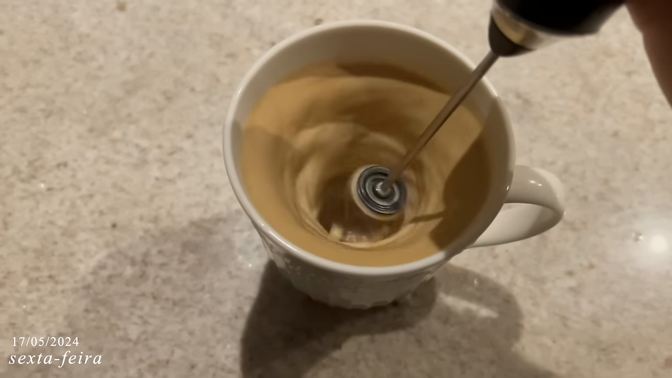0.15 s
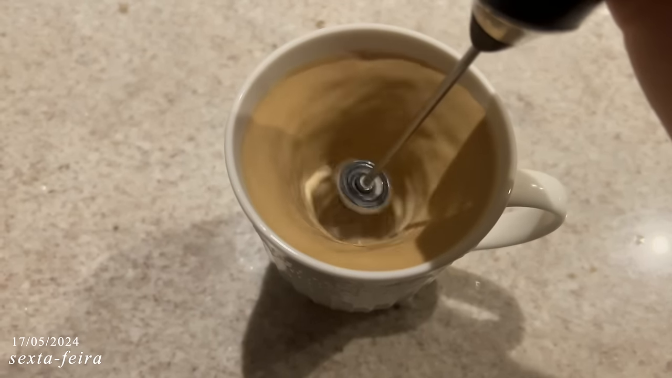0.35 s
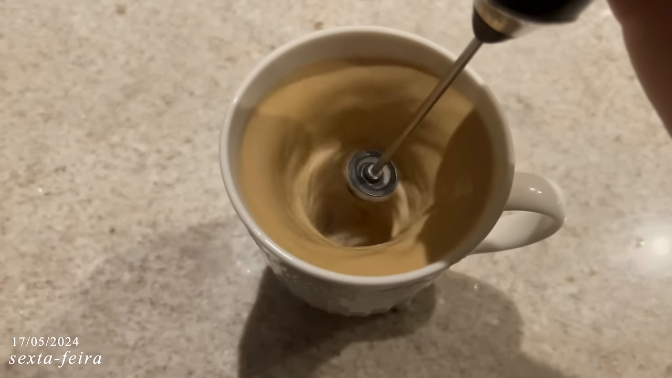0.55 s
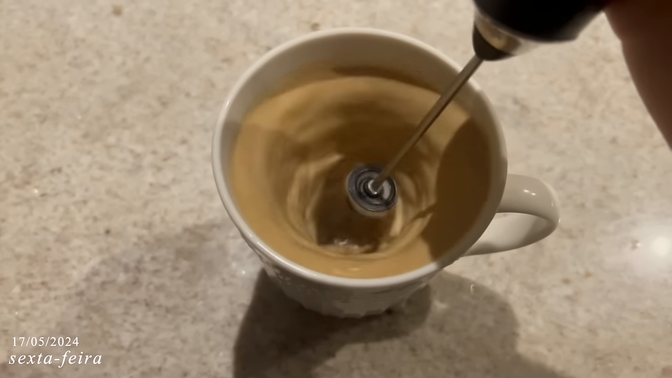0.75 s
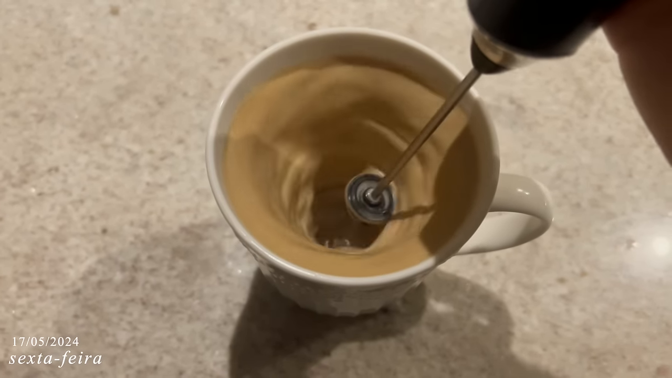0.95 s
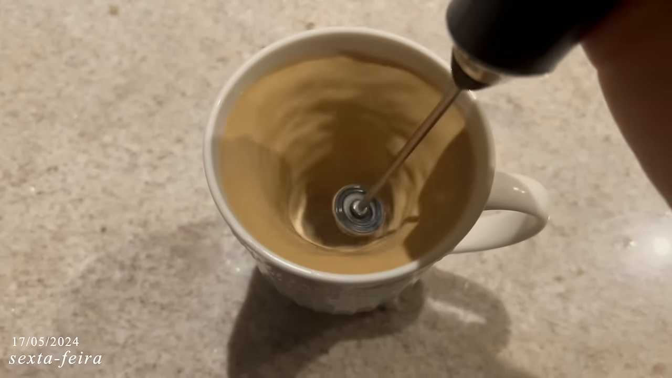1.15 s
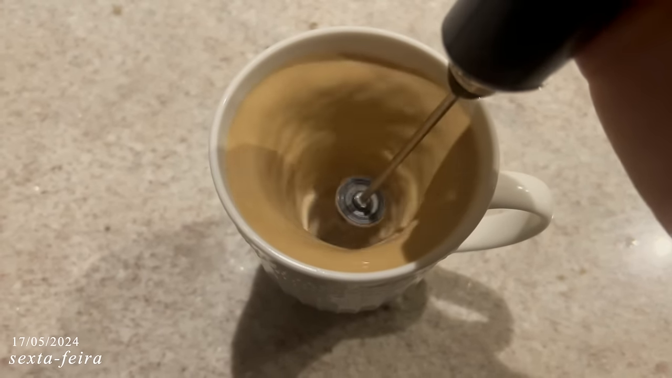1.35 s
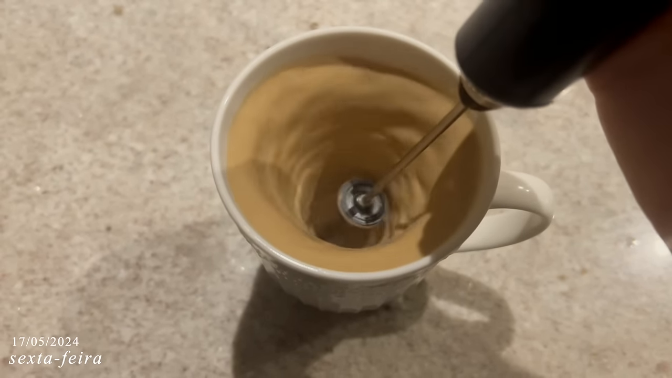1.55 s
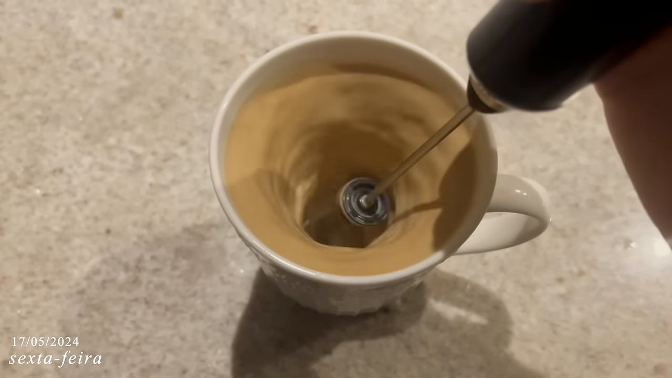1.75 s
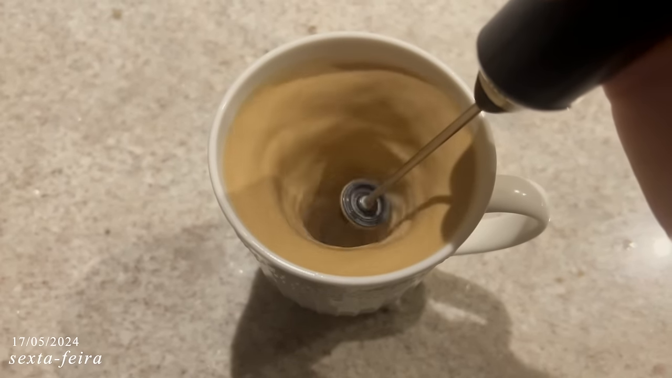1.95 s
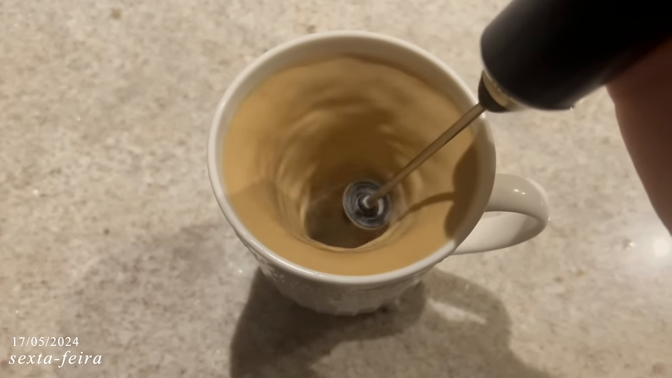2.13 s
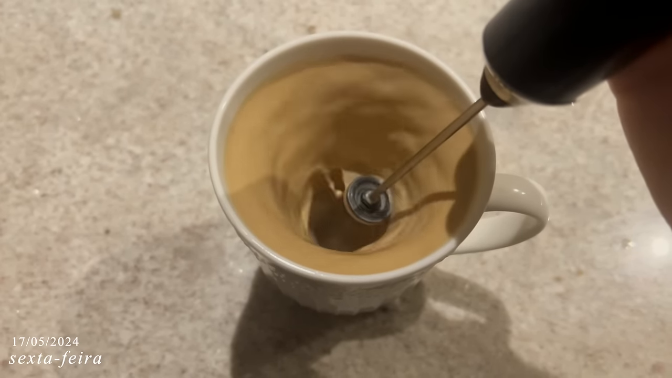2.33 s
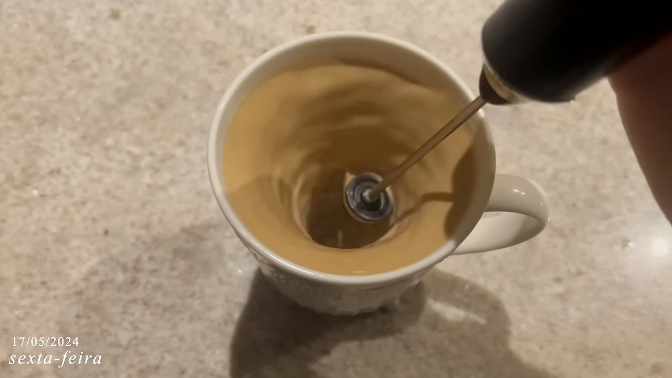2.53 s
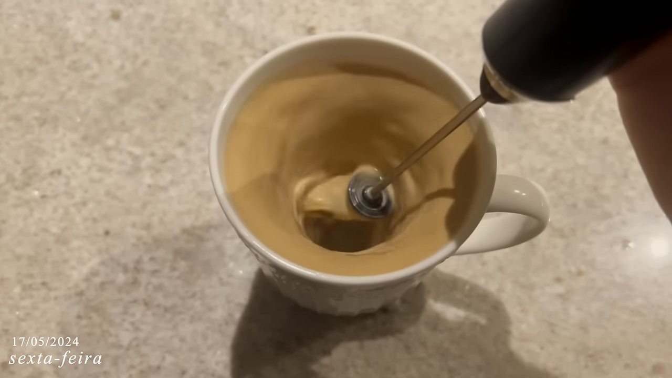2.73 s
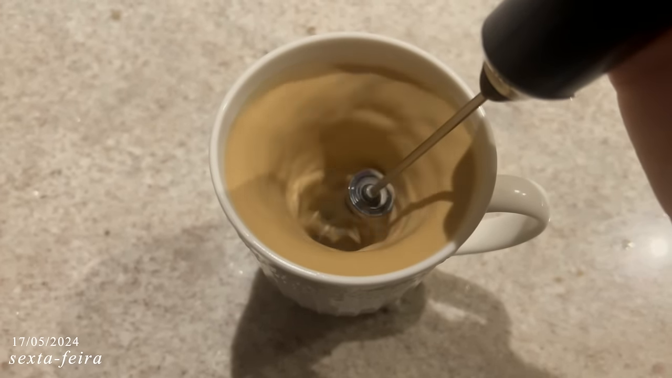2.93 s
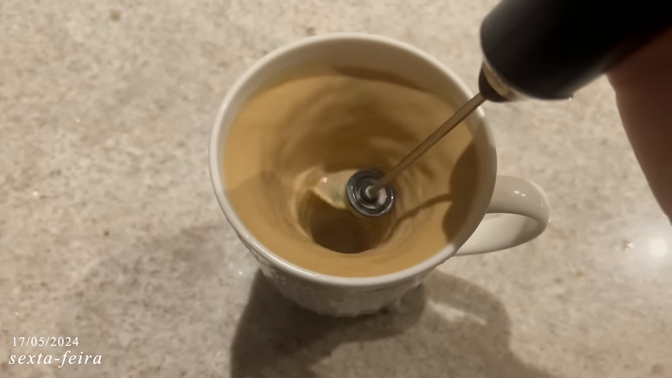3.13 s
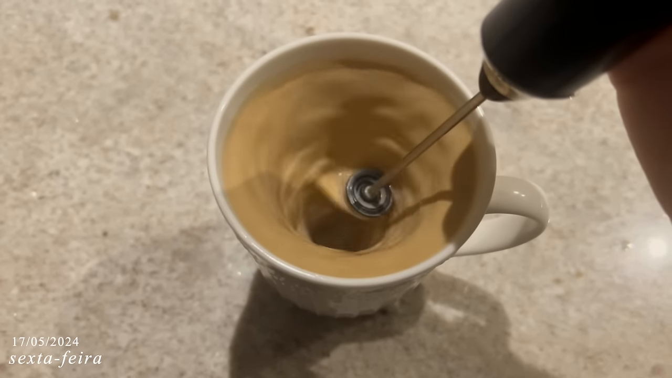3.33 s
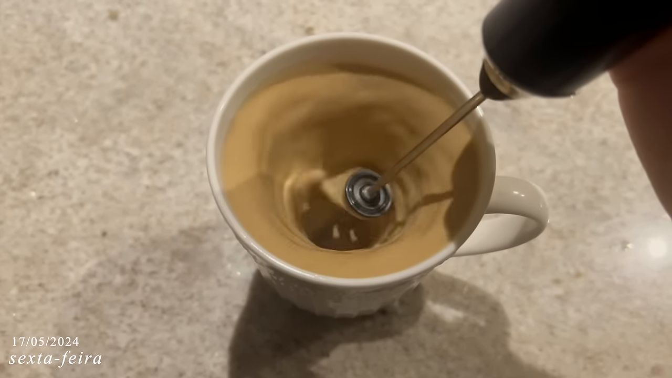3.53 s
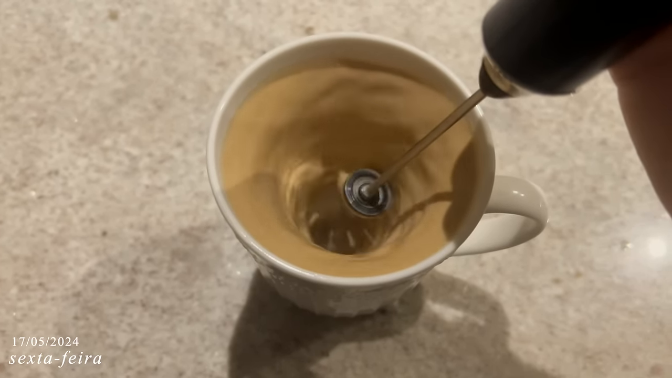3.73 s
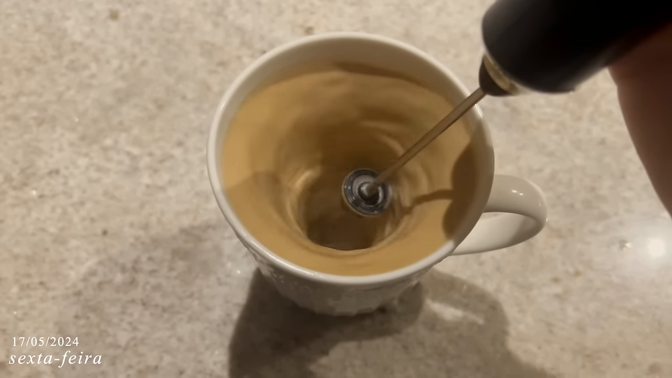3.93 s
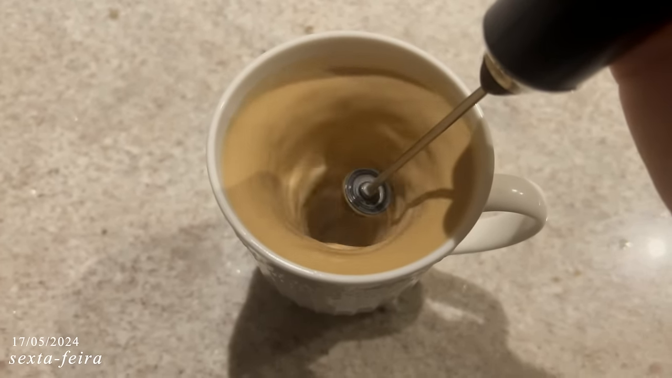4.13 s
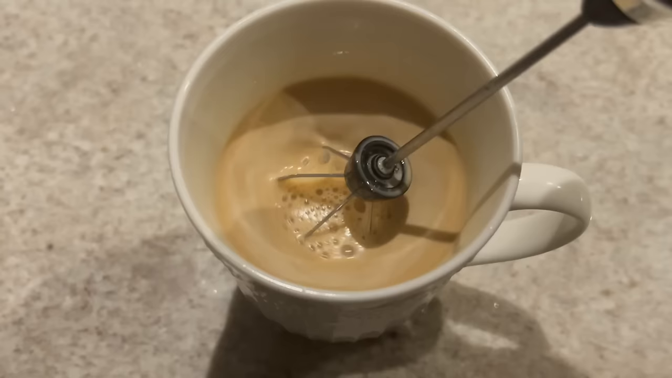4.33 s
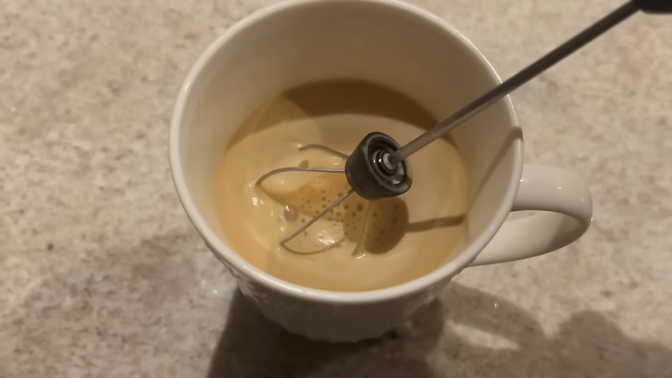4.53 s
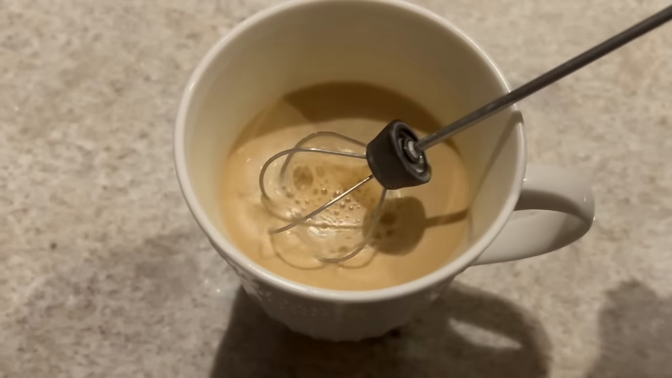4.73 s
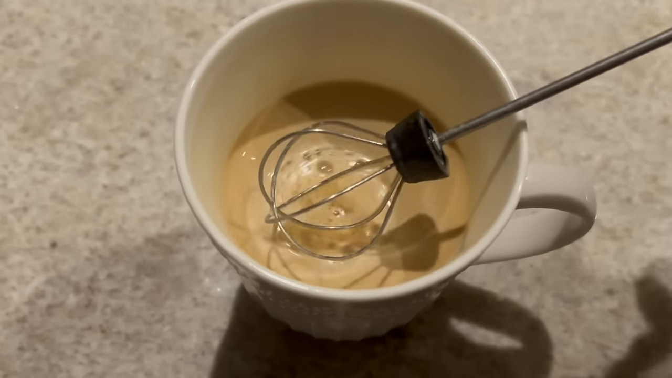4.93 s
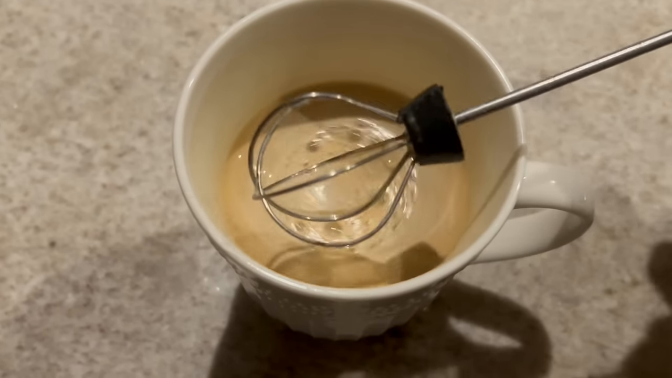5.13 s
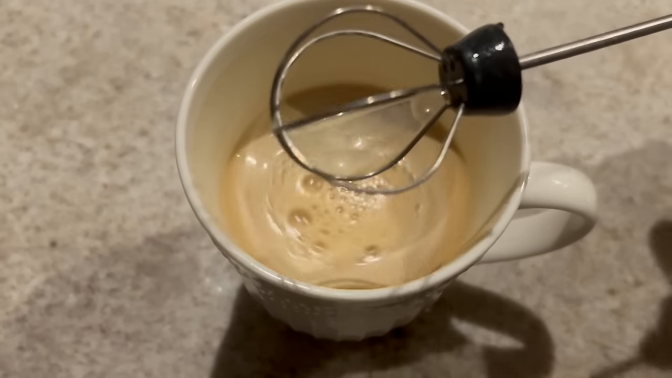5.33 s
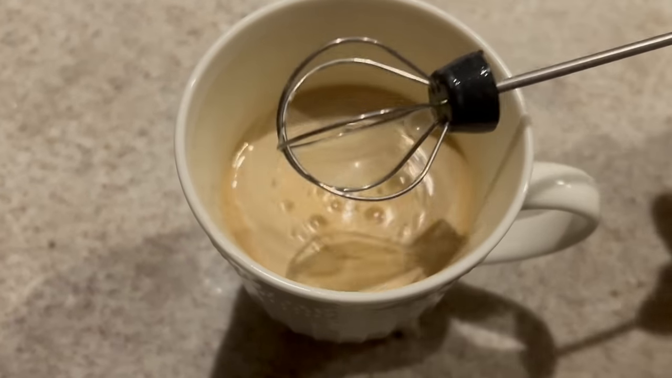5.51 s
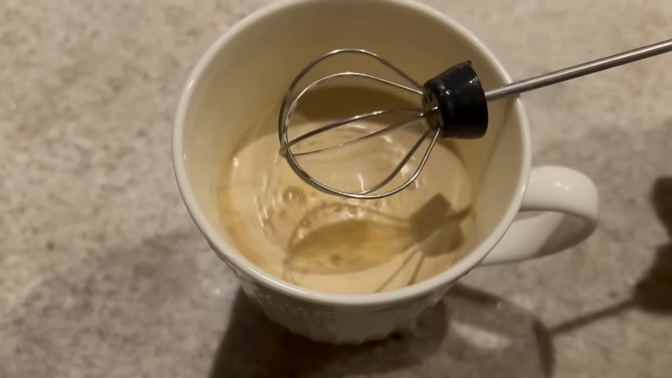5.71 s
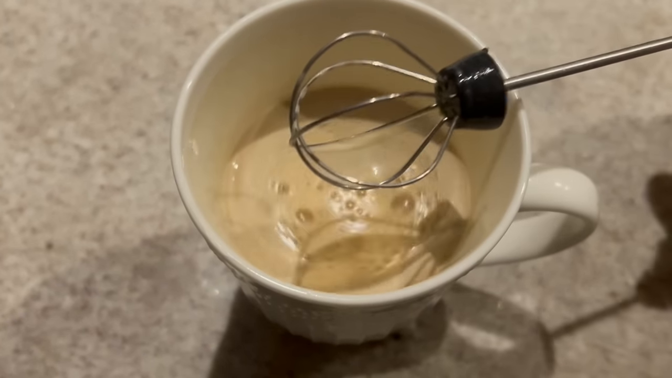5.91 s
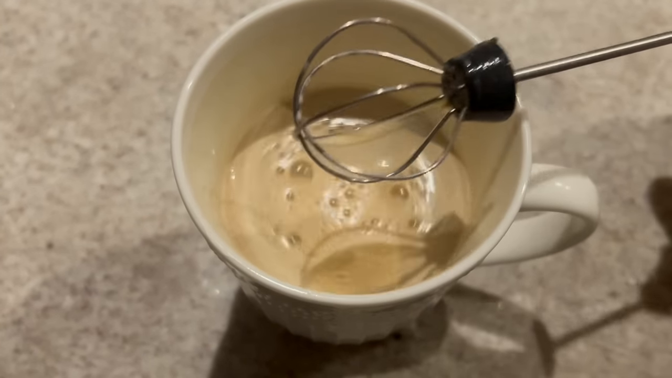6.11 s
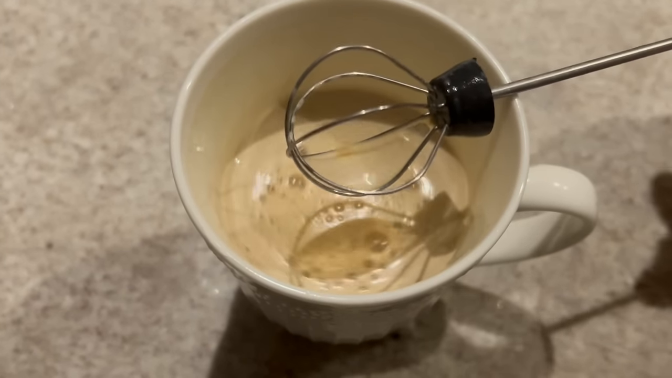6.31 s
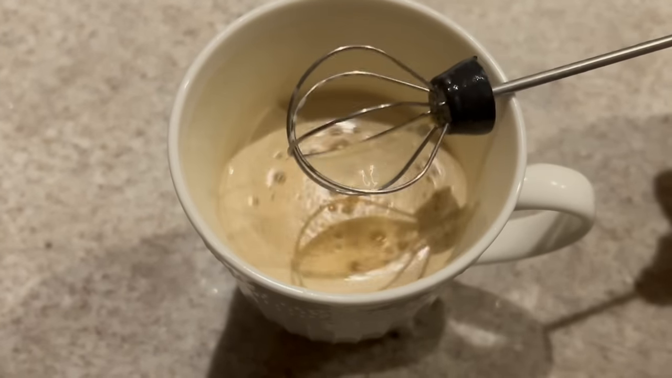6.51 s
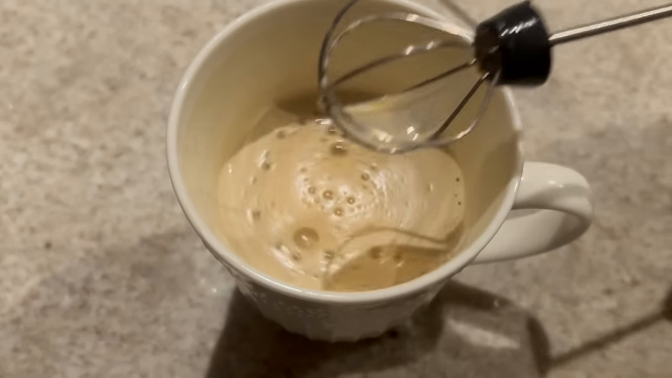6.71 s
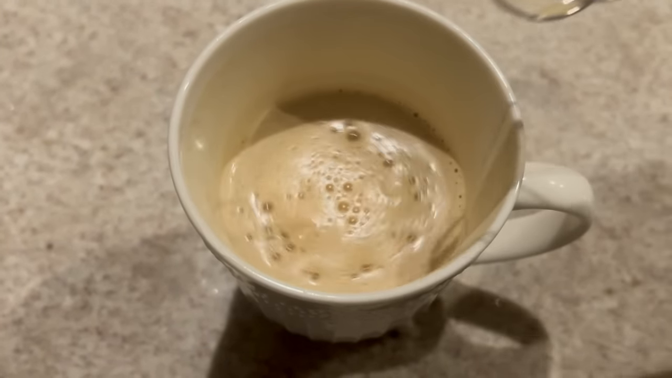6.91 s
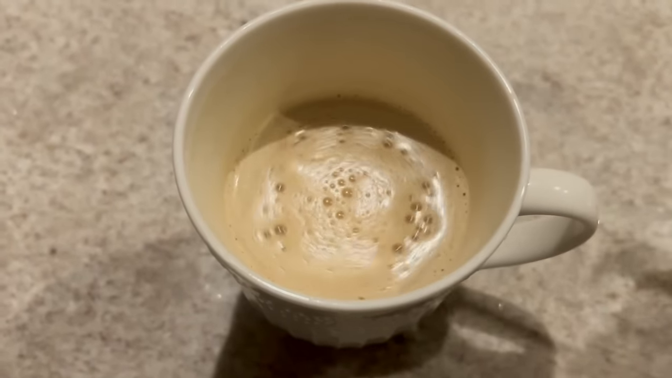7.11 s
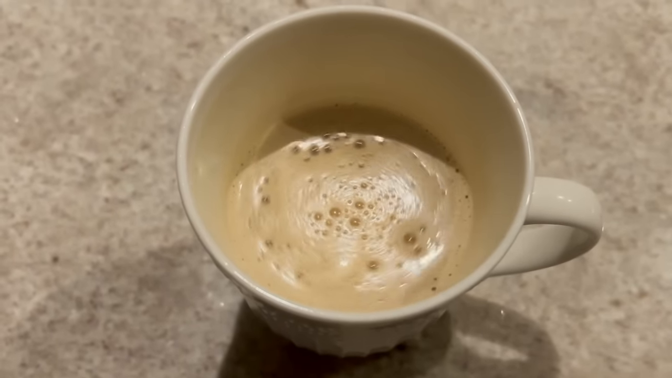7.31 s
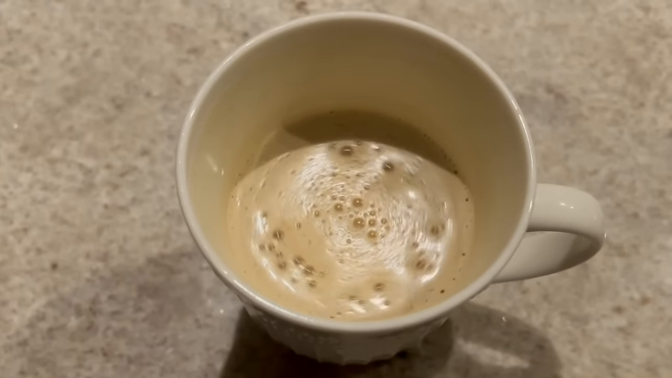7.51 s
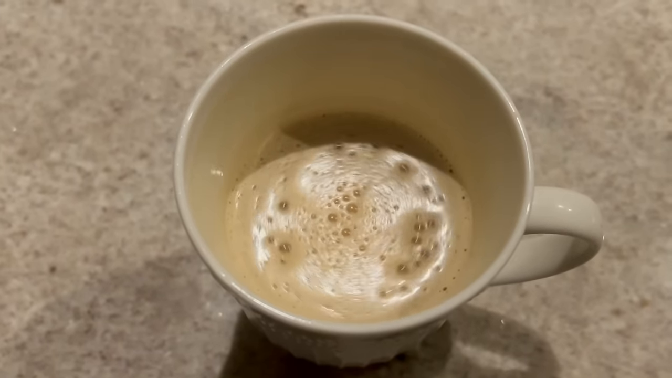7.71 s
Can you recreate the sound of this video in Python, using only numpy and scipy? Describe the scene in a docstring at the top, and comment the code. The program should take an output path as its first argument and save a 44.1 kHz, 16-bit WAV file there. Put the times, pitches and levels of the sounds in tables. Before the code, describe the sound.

From 0 to about 4.4 seconds a handheld battery whisk churns coffee in a ceramic mug, very close. The sound is a fast, wet, hollow flutter with gurgling air pockets, densest in the first 0.7 seconds, bright droplets and small high tinks of wire on glaze. A thin, steady motor whine sits over it, with a faint low hum as the shaft labours around 3.2 to 3.7. At 4.4 everything stops instantly, leaving quiet room tone, a soft refrigerator buzz and faint foam crackle that fades. Tiny low creaks of the handle run from 4.4 to 7.2, strongest around 6.1 to 6.5. Sharp hard taps fall at 5.6, 6.0, 6.2 and 6.5, growing louder, each with a tiny bounce and short bright room echo. A sleeve brushes softly near 5.8. Quiet kitchen tone remains until the end, near 7.9.

```python
"""A handheld whisk churns milky coffee in a ceramic mug close to a phone, and its drive whines; then it stops dead.
Its wires slap: filtered noise makes the froth, short tones the trapped air and the touches on the glaze.
After that the handle creaks in the grip and four sharp taps, sums of dying tones, ring round the hard room.
Foam crackles as it settles, a sleeve brushes past, and behind it all a refrigerator buzzes in room tone."""
import sys
import numpy as np
from scipy import signal
from scipy.fft import rfft, irfft, next_fast_len
from scipy.io import wavfile
from scipy.ndimage import map_coordinates

SR = 44100
rng = np.random.default_rng(int(sys.argv[2]) if len(sys.argv) > 2 else 0)


def wav_out(sig):
    """Save sig, one row per channel (or a flat mono array), as 16-bit PCM at SR to the path in sys.argv[1]."""
    wavfile.write(sys.argv[1], SR, np.round(np.clip(np.atleast_2d(sig).T, -1, 1) * 32767).astype(np.int16))


def voltage_ratio(decibels):
    """Convert decibels (scalar or array-like) to amplitude ratios, 20 dB per decade."""
    exponent = np.asarray(decibels, float) / 20
    return 10 ** exponent


N = 346626
T = np.arange(N) / SR
CUT = 4.367  # s, the whisking ends at once
# How the whisk is worked: t/s, churn level/dB, shallowness of the whisk (0-1)
WHISKING = [(0, -27.5, 0.5), (.18, -29.5, 0.93), (.45, -28, 0.57), (.98, -29.5, 0.86), (1.25, -27.5, 0.6),
            (1.42, -29.5, 0.98), (1.63, -29.5, 0.38), (1.75, -32, 0.55), (2.05, -29.5, 0.79),
            (2.4, -31, 0.66), (2.8, -31, 0.16), (4.36, -30, 0.33)]
# Resonance of the air over the liquid, with the whisk low: f/Hz, level/dB
AIR_CAVITY = [(330, -31.5), (450, -5), (540, 5), (640, -10.5), (900, -36.5)]


def unit(x):
    """Scaled to rms 1."""
    return x / np.sqrt(np.mean(x ** 2) + 1e-20)


def along(points, hz):
    """Reads a curve of (Hz, value) points on a log frequency axis."""
    f, v = np.transpose(points)
    return np.interp(np.log(hz + 1), np.log(f + 1), v)


def curves(rows):
    """One value per sample for each column after the time."""
    s, *cols = np.transpose(rows)
    return [np.interp(T, s, c) for c in cols]


def wobble(rate):
    """A smooth random curve through so many random points a second."""
    coarse = T[::32]
    points = rng.standard_normal(int(N * rate / SR) + 4)
    return np.interp(T, coarse, map_coordinates(points, [coarse * rate]))


def swells(rows):
    """Gain of smooth bumps (s, half length s, dB), added in power."""
    return np.sqrt(sum(voltage_ratio(2 * db) * np.exp(-2 * ((T - s) / half_s) ** 2) for s, half_s, db in rows))


def coloured(x, spectrum):
    """Filters x to a (Hz, dB) gain without sounding ahead of time, then brings it to rms 1."""
    m = 2 * next_fast_len(N // 2 + 4096)
    gain = voltage_ratio(along(spectrum, np.fft.rfftfreq(m, 1 / SR)))
    # folding the cepstrum forward in time gives the minimum-phase filter
    cepstrum = irfft(np.log(np.maximum(gain, 1e-5)), m)
    cepstrum[1:m // 2] *= 2
    cepstrum[m // 2 + 1:] = 0
    return unit(irfft(rfft(x, m) * np.exp(rfft(cepstrum)), m)[..., :N])


def ports(a, b, alike, lean):
    """Two microphone ports hear a alike and b opposed, in the share set by their likeness."""
    hz = np.fft.rfftfreq(N, 1 / SR)
    turn = np.arccos(np.clip(along(alike, hz), 0, 1)) / 2
    mid, side = rfft(a) * np.cos(turn), rfft(b) * np.sin(turn)
    tilt = voltage_ratio(along(lean, hz) / 2)
    return irfft(np.array([(mid + side) * tilt, (mid - side) / tilt]), N)


def splash(per_s, spread_db, smear_s, bed_db):
    """Random slaps, bunched once a turn of the shaft, each a short puff of noise, on a steady bed."""
    turns_per_s = 26
    bunching = 1 + 0.38 * np.cos(2 * np.pi * (turns_per_s * T + 0.5 * wobble(4)))
    size = voltage_ratio(spread_db * np.minimum(rng.exponential(size=N), 3))
    slaps = (rng.random(N) < bunching * per_s / SR) * size
    puff = np.exp(-np.arange(SR // 20) / SR / smear_s)
    return (unit(signal.fftconvolve(slaps, puff)[:N]) + voltage_ratio(bed_db)) * rng.standard_normal(N)


def blips(rows, cycles, gain_db):
    """Short tones (s, dB, Hz) that swell to their peak in some cycles and then die away."""
    out = np.zeros(N + SR)
    for s, db, hz in rows:
        u = np.arange(int(8 * cycles * SR / hz)) * hz / SR / cycles  # time, 1 at the peak
        tone = u * np.exp(1 - u) * np.sin(2 * np.pi * cycles * u)
        out[round(s * SR):][:len(u)] += voltage_ratio(db + gain_db) * tone
    return out[:N]


def froth():
    """Slaps of the wires excite the mug's air and walls and heave the liquid; fine spray fizzes above."""
    # sound of the mug with a wide vortex: f/Hz, level/dB
    wide_vortex = [(650, -37.5), (772, -26), (1230, -3), (1560, 4), (1850, -7), (2220, -2), (2470, -9),
                   (4600, -20), (10100, -120)]
    # sound of the mug with the whisk low: f/Hz, level/dB
    low_whisk = [(380, -40.5), (650, -9), (798, -11.5), (947, -4), (1180, 6.5), (1850, -8), (4040, -21),
                 (10100, -120)]
    # liquid heaving round the wall: f/Hz, level/dB
    slosh_sound = [(80, -30.5), (350, 20), (440, -28)]
    # heaves of the liquid: t/s, half length/s, level against the churn/dB
    heaves = [(0, 0.056, -12), (.42, 0.5, -21), (1.64, 0.12, -17.5), (3.45, 0.66, -19.5)]
    # sound of the fine spray: f/Hz, level/dB
    spray_sound = [(2470, -23.5), (4550, -17), (5660, -3.5), (6800, -3), (7380, -8), (8200, -2.5),
                   (9300, -6), (10300, -3), (12200, -13.5), (15700, -17)]
    boom_deep_db, boom_shallow_db = -2.5, -11.5  # against the churn
    cavity_drop = 0.92  # the cavity is pitched lower round a shallow whisk
    churn_db, shallow = curves(WHISKING)
    shallow = np.clip(shallow, 0, 1)

    def mix(wide, low):
        return np.sqrt(shallow) * wide + np.sqrt(1 - shallow) * low

    slaps = splash(per_s=210, spread_db=2.5, smear_s=0.00065, bed_db=2)
    body = mix(coloured(slaps, wide_vortex), coloured(slaps, low_whisk))
    air = slaps + 0.66 * rng.standard_normal(N)
    lower_cavity = [(hz * cavity_drop, db) for hz, db in AIR_CAVITY]
    boom = unit(mix(coloured(air, lower_cavity), coloured(air, AIR_CAVITY)))
    boom_db = boom_deep_db + (boom_shallow_db - boom_deep_db) * shallow
    slosh = swells(heaves) * coloured(slaps, slosh_sound)
    droplets = splash(per_s=75, spread_db=5.0, smear_s=0.0012, bed_db=7.0)
    fizz = spray() * coloured(droplets, spray_sound)
    return voltage_ratio(churn_db) * (voltage_ratio(-0.41) * unit(body) + voltage_ratio(boom_db) * boom + slosh + fizz)


def spray():
    """Gain of the spray against the churn: a steady part, and more when the wires break the surface."""
    # the wires break the surface: t/s, level against the churn/dB
    skims = [(.36, -4.5), (.96, -5), (1.55, -9), (2.0, -9.5), (2.35, -7)]
    steady_db, skim_half_s = -11, 0.23
    return np.hypot(voltage_ratio(steady_db), swells([(s, skim_half_s, db) for s, db in skims]))


def motor():
    """The drive whines on a fixed pitch and its multiples; the bent shaft hums low, louder when loaded."""
    # multiples 1-7 of the drive pitch, in order: level/dB
    whine_levels = [-49, -51, -56, -57, -57, -49, -48]
    # the shaft labours: full load from/s, to/s, ramp on either side/s
    start, end, ramp = 3.15, 3.72, 0.22
    drive_hz, shaft_hz = 974.5, 188.2
    turn_s, turn_db = 1, -3.5  # the hand turns the drive away and dims its top line
    idle_db, loaded_db = -68.5, -53.5  # the hum, before its wobble
    whine = np.zeros(N)
    for k, db in enumerate(whine_levels, start=1):
        level_db = db + 2.5 + 1.0 * wobble(7.8)
        if k == len(whine_levels):
            level_db = level_db + turn_db * (T > turn_s)
        whine += voltage_ratio(level_db) * np.sin(2 * np.pi * (k * drive_hz * T + 0.038 * wobble(30)))
    load = np.clip(np.minimum(T - start, end - T) / ramp + 1, 0, 1)
    hum_db = idle_db + (loaded_db - idle_db) * load + 4.4 * wobble(17)
    hum_turns = np.cumsum(shaft_hz + 4 * wobble(6.2)) / SR
    return whine + voltage_ratio(hum_db) * np.sin(2 * np.pi * hum_turns)


def gulps():
    """Trapped air rings at the pitch of the vortex, higher when shallow, with a brighter snap; glugs lie low."""
    # loud air pockets slapped shut: t/s, level/dB
    pockets = [(0.1183, -2.5), (0.128, -6.5), (.165, -9), (0.1927, -6.5), (.197, -8), (.241, -9.5),
               (0.2677, -7), (0.28, -5), (0.288, -7), (.341, -7), (0.3625, -6.5), (0.451, -9),
               (0.561, -8.5), (0.6396, -5), (1.586, -11), (1.65, -7.5), (1.6846, -9), (1.92, -9),
               (1.982, -10.5), (3.049, -6.5), (3.2165, -9), (3.4252, -9), (3.716, -11), (3.84, -11.5),
               (4.121, -8), (4.1612, -8.5)]
    # the cavity is struck whole: t/s, level/dB
    cavity_hits = [(.04, -21.5), (.632, -15)]
    churn_db, shallow = curves(WHISKING)

    def pitch(s, spread):
        vortex_hz = 1150 + 400 * np.clip(shallow[int(s * SR)], 0, 1)
        return vortex_hz * np.exp(spread * rng.standard_normal())

    loud = [(s, db, pitch(s, spread=0.042)) for s, db in pockets]
    # 300 small pockets at random moments
    crowd = [(s, churn_db[int(s * SR)] + 5.0 + 7 * size, pitch(s, spread=0.14))
             for s, size in rng.random((300, 2)) * [CUT, 1]]
    cavity_hz = AIR_CAVITY[2][0]
    glugs = blips([(s, db, cavity_hz) for s, db in cavity_hits], cycles=2.9, gain_db=-6)
    snaps = blips([(s, db, 1.505 * hz) for s, db, hz in loud + crowd], cycles=1.2, gain_db=-15)
    return blips(loud + crowd, cycles=1.1, gain_db=-6.5) + snaps + glugs


def tinks():
    """The wire grazes the glaze: loud touches, and light ones that grow fast with the spray."""
    # loud touches: t/s, level/dB
    touches = [(0.1724, -16), (0.2096, -15), (0.2188, -12.5), (0.321, -16), (1.142, -18), (1.153, -13),
               (1.1945, -13.5), (1.7957, -18), (3.2808, -16), (3.616, -17)]
    touch_db = curves(WHISKING)[0] + 40 * np.log10(spray())
    light = [(s, touch_db[int(s * SR)] + 16.0 + 7 * size)
             for s, size in rng.random((100, 2)) * [CUT, 1]]
    rows = [(s, db, rng.normal(5480, 190)) for s, db in touches + light]
    return blips(rows, cycles=1.9, gain_db=0.0)


def spits():
    """Droplets flung at the wall: bright puffs of noise a few milliseconds long."""
    # bright droplets: t/s, level/dB
    droplets = [(0.364, -15), (.646, -20.5), (.75, -14.5), (1.051, -17), (1.6015, -15.5), (2.2858, -17)]
    t = T[:SR // 20]
    env = np.zeros(N + SR)
    for s, db in droplets:
        env[round(s * SR):][:len(t)] += voltage_ratio(db - 60 * t / 0.0051)
    return env[:N] * coloured(rng.standard_normal(N), [(2500, -25.0), (9000, 3.0), (15000, -3.5)])


def taps():
    """Each tap is a crack, a duller knock and quickly damped modes, with one bounce and a room tail."""
    # taps: t/s, level/dB, bounce later by/s, bounce against the tap/dB
    blows = [(5.6308, -26.5, .0085, -4.5), (5.9606, -15.5, .0095, -11.5), (6.2326, -13, .0095, -17),
             (6.486, -9, .012, -13)]
    # ringing modes: f/Hz, level/dB, time to fall 60 dB/s
    modes = [(545, 2, 0.051), (1085, 6.5, 0.029), (1442, 17.5, 0.021), (2525, -12.5, 0.023),
             (3020, -3, 0.014), (3530, -5.5, 0.019), (5290, -6.5, 0.015), (6400, -2.5, 0.018),
             (8360, 3, 0.0063)]
    # faint ticks of the wires: t/s, level/dB
    wire_ticks = [(6.341, -47), (7.684, -62)]
    # the counter top is bumped: t/s, level/dB, f/Hz
    bumps = [(6.31, -54, 117.5), (6.492, -52, 61)]
    knock_base_db, knock_grows = -3, 0.57  # harder taps knock more
    body_lag_s = 0.00205  # the low modes answer after the crack
    mode_spread_db, room_db = 2.2, -6
    out, t = np.zeros((2, N + 2 * SR)), T[:SR // 10]
    dull = signal.butter(2, [270, 2100], "band", fs=SR)
    thin = signal.butter(2, 420, "high", fs=SR)
    click = 1. * (t == 0)
    for s, db, bounce_s, bounce_db in blows:
        knock_db = knock_base_db + knock_grows * db
        ring = np.zeros(len(t))
        for hz, level, t60 in modes:
            low = hz < 2000
            late = np.maximum(t - body_lag_s * low, 0)
            # each tap strikes the modes at new strengths and slightly new pitches
            mode_db = level + low * knock_db + rng.normal(0, mode_spread_db) - 60 * t / t60
            onset = 1 - np.exp(-late * hz / 0.78)
            ring += voltage_ratio(mode_db) * onset * np.sin(2 * np.pi * hz * rng.normal(1, 0.0072) * late)
        crack_env = voltage_ratio(-60 * t / 0.018) * (1 - np.exp(-t / 0.0011))
        crack = crack_env * signal.lfilter(*thin, rng.standard_normal((2, len(t))))
        # the crack differs between the ports
        crack = crack[0] + 0.48 * crack[1] * np.array([[1], [-1]])
        knock_env = voltage_ratio(-60 * t / 0.053) * (1 - np.exp(-t / 0.001))
        knock = signal.lfilter(*dull, knock_env * rng.standard_normal(len(t)))
        # the walls send back a wash tinted by the modes
        to_room = 8 * signal.lfilter(*dull, click) + 3.7 * signal.lfilter(*thin, click) + 0.19 * ring
        tail = echoes(to_room, gap_s=0.0045)
        blow = voltage_ratio(db - 5.0) * (ring + 1.38 * crack + voltage_ratio(knock_db + 10.5) * knock)
        out[:, round(s * SR):][:, :len(t)] += blow
        out[:, round((s + bounce_s) * SR):][:, :len(t)] += voltage_ratio(bounce_db) * blow
        out[:, round(s * SR):][:, :tail.shape[1]] += voltage_ratio(db + room_db) * tail
    tick_rows = [(s, db, hz) for s, db in wire_ticks for hz, _, _ in modes[1:5]]
    ticks = blips(tick_rows, cycles=2.4, gain_db=0.5)
    return out[:, :N] + ticks + blips(bumps, cycles=2.7, gain_db=-2.0)


def echoes(x, gap_s):
    """The hard room answers after a gap: noise in which each frequency dies at its own speed."""
    # echo length of the kitchen: f/Hz, time to fall 60 dB/s
    dying_times = [(100, 1), (400, 0.86), (1400, 0.59), (4000, 1), (8000, 0.46), (12000, 0.02)]
    side_db = -4  # what differs between the ports, against what they share
    hz, t, z = signal.stft(rng.standard_normal((2, SR)), SR, nperseg=256)
    decay = voltage_ratio(-60 * t / along(dying_times, hz)[:, None])
    tail = signal.istft(z * decay, SR, nperseg=256)[1]
    tail = tail[0] + voltage_ratio(side_db) * tail[1] * np.array([[1], [-1]])
    tail = np.pad(tail / np.linalg.norm(tail[0]), ((0, 0), (int(gap_s * SR), 0)))
    return signal.fftconvolve(x[None], tail, axes=1)


def creaks():
    """The handle slips in the grip on one of two pitches; as the grip tightens the higher takes over."""
    # slips of the handle: t/s
    slip_times = [4.395, 4.465, 4.527, 4.603, 4.631, 4.671, 4.718, 4.755, 4.788, 4.837, 4.867, 4.961, 4.987,
                  5.016, 5.037, 5.065, 5.122, 5.142, 5.19, 5.243, 5.276, 5.317, 5.349, 5.398, 5.425, 5.509,
                  5.533, 5.562, 5.593, 5.624, 5.661, 5.698, 5.836, 5.904, 5.94, 6.011, 6.051, 6.076, 6.106,
                  6.144, 6.196, 6.267, 6.343, 6.372, 6.448, 6.478, 6.551, 6.62, 6.806, 6.878, 6.967, 7.031,
                  7.095, 7.213]
    # force of the grip: t/s, level of a slip/dB
    grip_force = [(4.4, -57.5), (5, -52), (5.84, -50.5), (6.08, -37), (6.5, -38), (6.62, -48.5),
                  (7.03, -46.5), (7.095, -41.5), (7.21, -48.5)]
    loose_hz, tight_hz, tightens_s, spread_db = 330, 381, 5.4, 3
    overtone_hz, overtone_db = 527, -13  # a second mode of the handle
    s = np.array(slip_times)
    size, tone = rng.standard_normal((len(s), 2)).T
    hz = np.where(s + 0.3 * tone < tightens_s, loose_hz, tight_hz)
    db = np.interp(s, *np.transpose(grip_force)) + spread_db * size
    main = blips(zip(s, db, hz), cycles=0.9, gain_db=0.5)
    overtone = blips(zip(s, db, overtone_hz + 0 * s), cycles=2.0, gain_db=overtone_db)
    direct = main + overtone
    return direct + voltage_ratio(-11) * echoes(direct, gap_s=0.00494)[:, :N]


def rustle():
    """A sleeve brushes softly after the first tap: a swell of dull noise."""
    # brushes of the cloth: t/s, half length/s, level/dB
    brushes = [(5.76, 0.16, -57.5)]
    cloth = [(150, 7.0), (600, 0.0), (1500, 3.0), (2800, -6.0), (5000, -29)]
    return swells(brushes) * coloured(rng.standard_normal(N), cloth)


def foam():
    """Tiny bubbles burst on the settling foam, high and ever fainter."""
    # fading of the foam: t/s, level/dB
    fading = [(CUT, -66), (5.9, -75.5), (7.86, -81.5)]
    pops = splash(per_s=71, spread_db=4.8, smear_s=0.0012, bed_db=2.5)
    bubbles = coloured(pops, [(3000, -36.5), (6500, -2.5), (9500, -0.5), (12500, -16.0)])
    return voltage_ratio(curves(fading)[0]) * bubbles


def kitchen():
    """Room tone of filtered noise, and the refrigerator's steady pitches wavering in level and phase."""
    # loudness of the room tone: t/s, level/dB
    tone_level = [(4.4, -62), (6, -59.5), (7.86, -61.5)]
    # room tone, with the bands the refrigerator's casing hisses in: f/Hz, level/dB
    tone_sound = [(55, -2), (90, -10), (220, -6.5), (480, -11.5), (640, -18.5), (880, -19.5), (1500, -9.5),
                  (2100, -14), (2680, -8), (3400, -7.5), (3950, -20.5), (4500, -10), (5150, -22),
                  (5850, -5.5), (6800, -17.5), (15700, -32)]
    # pitches of the refrigerator: f/Hz, level/dB
    fridge_lines = [(59.2, -72), (119, -76.5), (470, -78), (527, -82), (2649, -73), (2821, -80.5),
                    (3354, -73.5), (5766, -71), (8236, -84)]
    # how alike the ports hear the room: f/Hz, likeness (0-1)
    alike_far = [(60, 0.5), (380, 0.75), (700, 0.17), (1300, 0.57), (2400, .93), (5000, 0.7), (15000, .3)]
    waver_db = 1.6
    tone = voltage_ratio(curves(tone_level)[0]) * coloured(rng.standard_normal((2, N)), tone_sound)
    buzz = np.zeros(N)
    for hz, db in fridge_lines:
        level_db = db + 5.5 + waver_db * wobble(5)
        buzz += voltage_ratio(level_db) * np.sin(2 * np.pi * (hz * T + 0.094 * wobble(8.9)))
    return ports(tone[0] + buzz, tone[1], alike_far, [(1000, 0.3)])


def scene():
    """The whisking stops dead; the quiet kitchen goes on."""
    # how alike the ports hear the whisk: f/Hz, likeness (0-1)
    alike_near = [(120, 0.82), (260, 0.85), (400, 1), (700, 0.53), (1300, 1), (3800, 0.62), (15000, 0.4)]
    # balance of the ports for the whisk: f/Hz, left minus right/dB
    near_lean = [(500, -.5), (1100, 3), (2500, 0)]
    events = gulps() + tinks() + spits()
    # a second, independent froth is what the ports hear opposed
    near = ports(froth() + events + motor(), froth(), alike_near, near_lean)
    running = np.clip((CUT - T) / 0.0014, 0, 1)
    return running * near + creaks() + taps() + rustle() + foam() + kitchen()


def band_limit(x):
    """A steep low-pass at the top of the band."""
    return signal.sosfilt(signal.butter(12, 16740, fs=SR, output="sos"), x)


def record(dry):
    """The phone keeps a band from low bass to its upper limit."""
    bass_hz, top_hz = 46, 15650
    hz = np.fft.rfftfreq(N, 1 / SR)
    low_cut = 1 / (1 + (bass_hz / (hz + 1)) ** 6)
    high_cut = voltage_ratio(-30 * np.clip((hz - top_hz) / 300, 0, 1))  # 30 dB down within 300 Hz
    return band_limit(irfft(rfft(dry) * low_cut * high_cut, N))


dry = scene()
out = record(dry)
wav_out(out)
```